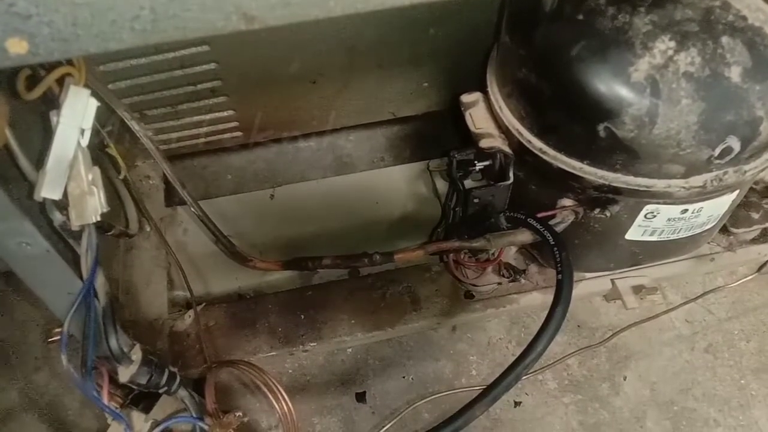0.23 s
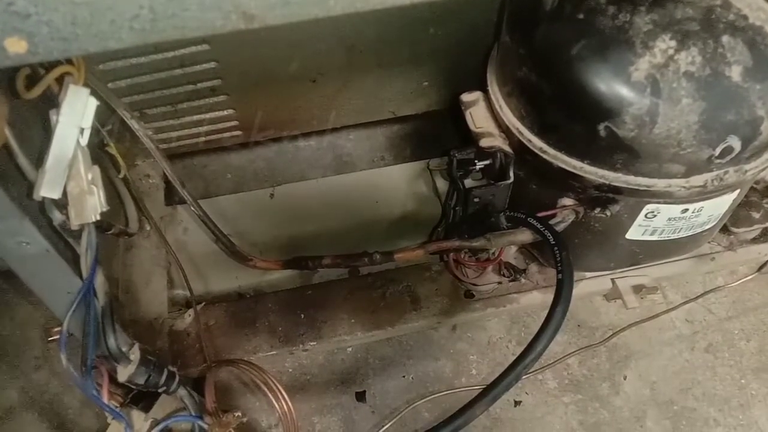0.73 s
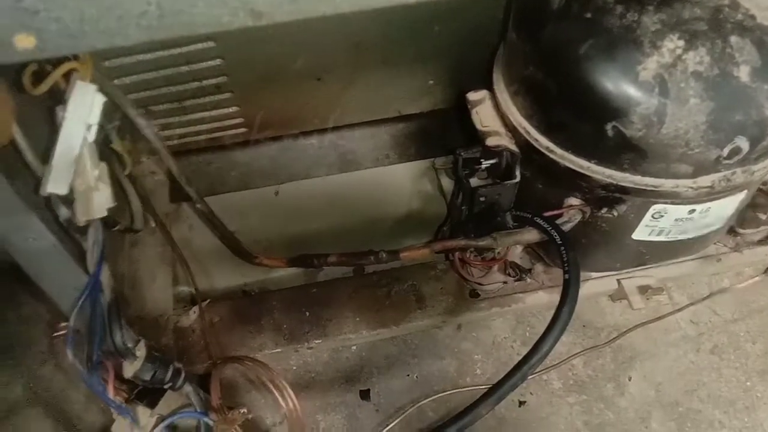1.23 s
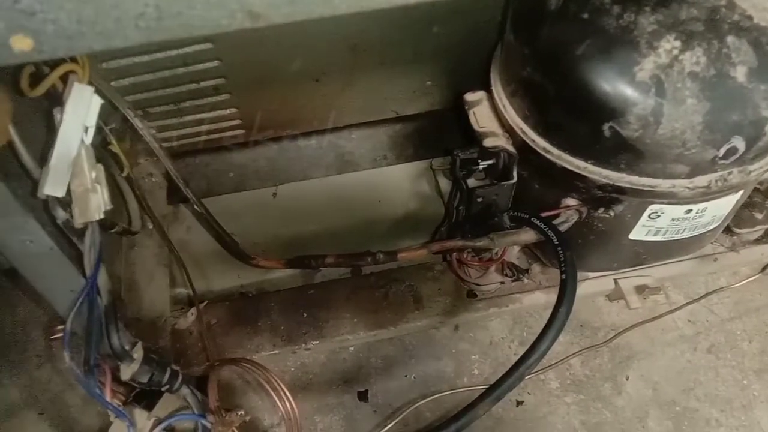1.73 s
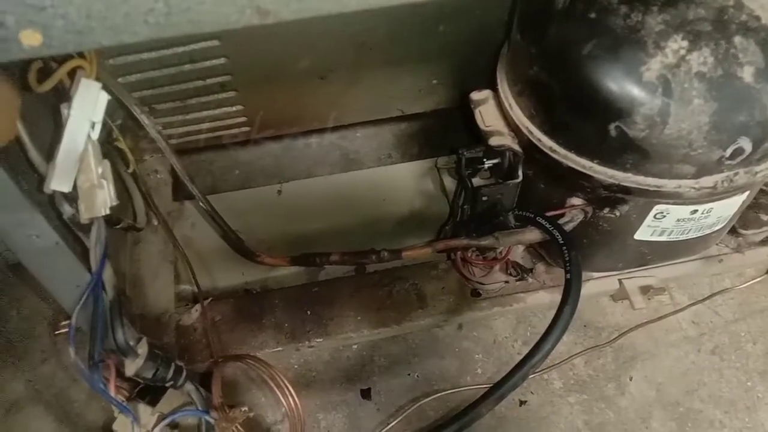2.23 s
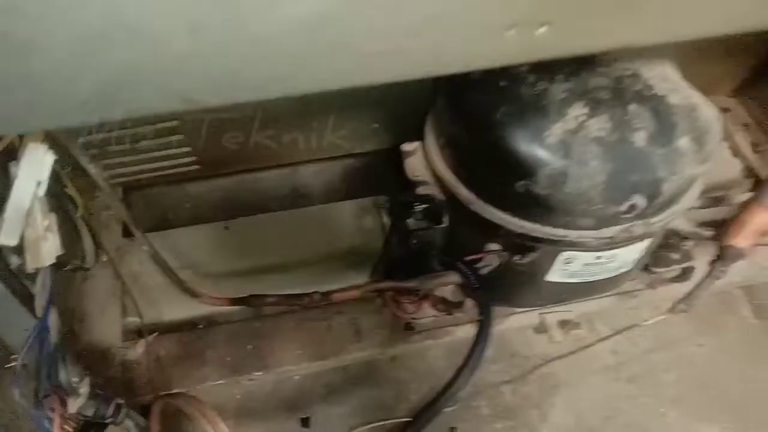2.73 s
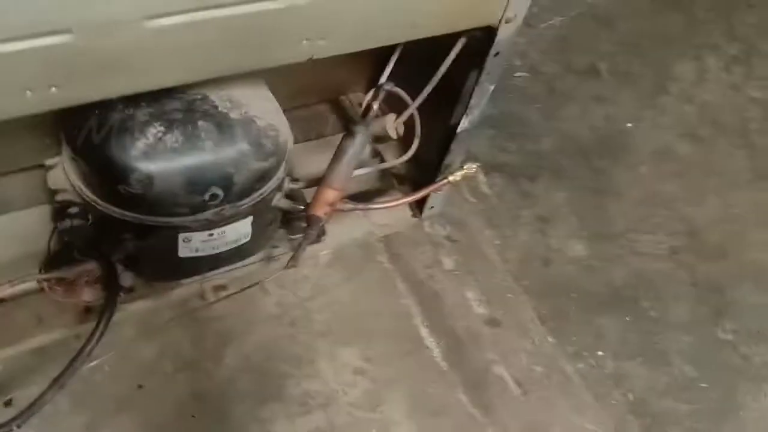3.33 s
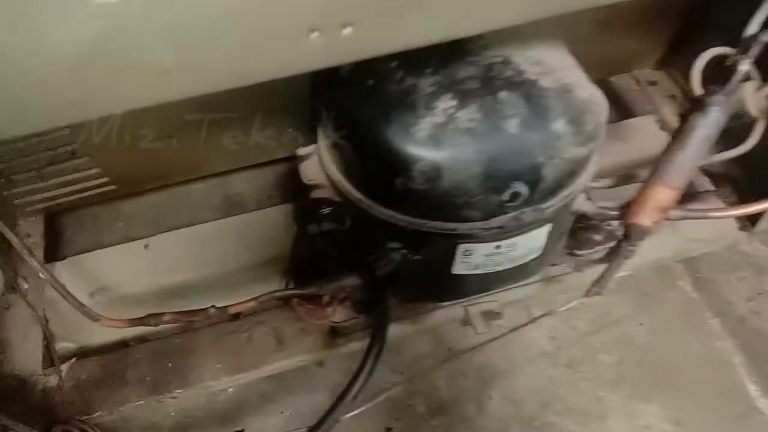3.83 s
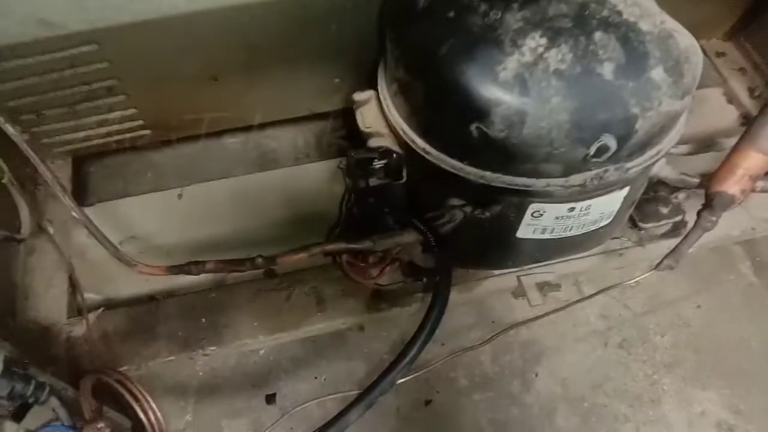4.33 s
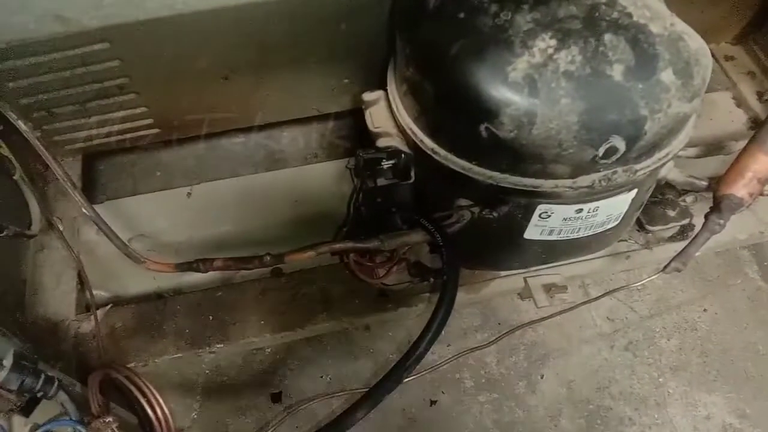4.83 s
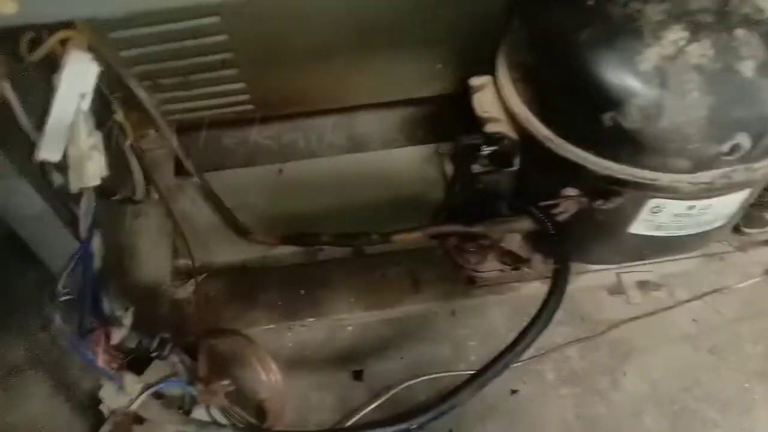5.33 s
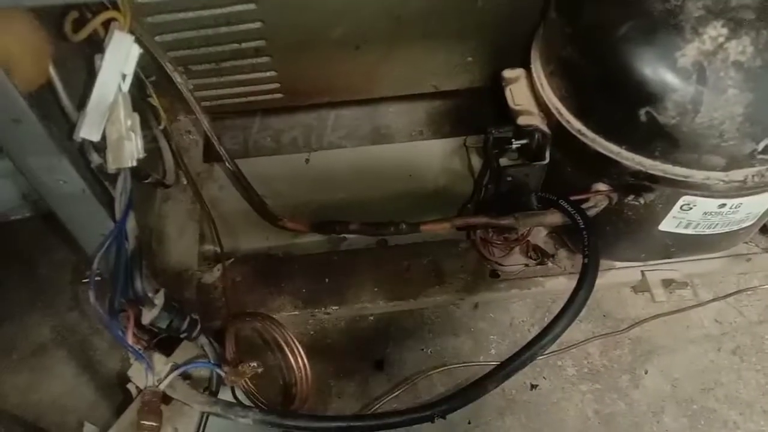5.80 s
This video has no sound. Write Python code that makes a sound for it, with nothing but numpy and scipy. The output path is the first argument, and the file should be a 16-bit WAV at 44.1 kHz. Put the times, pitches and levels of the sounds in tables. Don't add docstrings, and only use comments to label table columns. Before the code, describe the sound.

Cables and connectors clatter down, one snaps sharply home, then small parts rustle, scrape and click with low handling thuds in a quiet workshop.

```python
import sys
import numpy as np
from scipy import signal
from scipy.fft import rfft, irfft, next_fast_len
from scipy.io import wavfile
from scipy.ndimage import uniform_filter1d, map_coordinates

SR = 44100
rng = np.random.default_rng(int(sys.argv[2]) if len(sys.argv) > 2 else 0)


def volts(x):
    e = np.asarray(x, float) / 20
    return 10 ** e


def wav_out(sig):
    wavfile.write(sys.argv[1], SR, np.round(np.clip(np.atleast_2d(sig).T, -1, 1) * 32767).astype(np.int16))


N = 267334

LOUD_IS_BRIGHT = 0.29


def unit(x):
    return x / np.sqrt(np.mean(x ** 2) + 1e-30)


def along(points, hz):
    f, v = np.transpose(points)
    return np.interp(np.log(hz + 1), np.log(f + 1), v)


def wobble(rate_hz, n=N):
    knots = rng.standard_normal(int(n * rate_hz / SR) + 4)
    return map_coordinates(knots, [np.arange(n) * rate_hz / SR])


def filtered(x, gain):
    m = 2 * next_fast_len(x.shape[-1] // 2 + 4096)
    spectrum = rfft(x, m) * gain(np.fft.rfftfreq(m, 1 / SR))
    return irfft(spectrum, m)[..., :x.shape[-1]]


def noise(n, gain):
    return filtered(rng.standard_normal(n), gain)


def causal(gain):
    cepstrum = irfft(np.log(gain + 1e-6))
    half = len(cepstrum) // 2
    cepstrum[1:half] *= 2
    cepstrum[half + 1:] = 0
    return np.exp(rfft(cepstrum))


def peak(hz, centre_hz, width_hz):
    return 1j * hz * width_hz / (centre_hz ** 2 - hz ** 2 + 1j * hz * width_hz)


def over(hz, edge_hz):
    return 1 / (1 + (edge_hz / (hz + 1)) ** 16)


def patchy(x, depth_db):
    z = signal.stft(np.pad(x, (0, 512)), nperseg=512)[2]
    field = uniform_filter1d(rng.standard_normal(z.shape), size=2, axis=0)
    field = uniform_filter1d(field, size=12, axis=1)
    return signal.istft(z * volts(depth_db * unit(field)), nperseg=512)[1][:len(x)]


def add(x, start_s, piece):
    i = round(start_s * SR)
    x[i:i + len(piece)] += piece[:len(x) - i]


def held(time_s):
    taken_s = [
        0,
        .8,
        1.2,
        2.3,
        3.12,
        3.62,
        4.2,
        4.9,
        5.1,
    ]
    return np.searchsorted(taken_s, time_s) - 1


def response(k, ring_db):
    # pitch_hz, density_db (per Hz)
    cable_colours = [
        [(35, -38.5), (60, -0.5), (135, 2), (668, -20), (1230, -9.5), (7600, -12), (9880, -44.5), (16700, -120)],
        [(35, -46), (60, -13), (130, 5.5), (503, -11), (1280, 0), (7600, -20), (9880, -54), (16700, -120)],
        [(180, -9), (300, -3), (838, -8), (934, -12.5), (7600, -30), (9880, -61.5), (16700, -120)],
        [(35, -35), (60, 7.5), (211, -6), (464, -14.5), (1250, -4.5), (7600, -10), (9880, -14), (16700, -120)],
    ]
    # pitch_hz, density_db (per Hz)
    part_colours = [
        [(120, -53), (200, -46), (362, -9.5), (1820, -7), (2700, -4), (7600, -13.5), (9880, -92), (16700, -120)],
        [(120, -51), (200, -36), (435, -17), (1360, -46), (1930, 2.5), (7600, -10.5), (9880, -49),
         (16700, -120)],
        [(35, -20), (60, 7), (852, -10.5), (1070, -20), (4580, -29), (7600, -56), (9880, -75), (16700, -120)],
        [(180, -13), (300, -24), (4480, -18), (6200, -1.5), (7600, -19), (9880, -54), (16700, -120)],
        [(35, -56), (60, 4.5), (172, 8), (403, -6), (1410, -9.5), (7600, -18.5), (9880, -74), (16700, -120)],
    ]
    # pitch_hz, width_hz, level_db
    bodies = [
        [(135, 63, -3.5), (1245, 59, -1), (2500, 150, -10), (5160, 260, -13.5), (7130, 340, -8.5),
         (8354, 120, -14.5)],
        [(1260, 98, 2), (2600, 300, -9.5), (3900, 310, -11.5), (5000, 250, -14.5)],
        [(848, 30, 3), (3040, 180, -19), (6000, 28, -29)],
        [(1246, 77, -1), (2644, 21, 3), (3470, 32, -1), (4660, 54, -3), (5450, 190, -5.5), (6810, 99, -1.5)],
        [(1230, 87, -8), (2260, 64, -7), (3640, 60, -7.5), (5590, 54, -8), (6700, 44, -29), (7130, 78, -7)],
        [(1572, 25, 11.5), (1940, 29, 7), (2457, 50, 11.5), (3255, 44, 4), (5120, 133, 0.5), (7200, 100, -10)],
        [(436, 130, -12), (1260, 53, -12), (3900, 78, -35), (4340, 110, -44)],
        [(6300, 61, -0.5)],
        [(167, 50, -12), (420, 34, 0.5), (1064, 10, -1), (1274, 41, -1.5)],
    ]
    colour = (cable_colours + part_colours)[k]

    def gain(hz):
        power = volts(2 * along(colour, hz))
        for pitch_hz, width_hz, db in bodies[k]:
            power = power + volts(2 * (db + ring_db)) * abs(peak(hz, pitch_hz, width_hz)) ** 2
        return np.sqrt(power)
    return gain


def treble(k):
    # pitch_hz, density_db (per Hz)
    top_octave = [(6000, -46), (7500, 5), (8200, -7.5), (8900, -1), (13400, -11.5), (14900, -7.5),
                  (15500, -9), (15800, -25.5)]
    # pitch_hz, width_hz, level_db
    jingle_hz, jingle_width_hz, jingle_db = (16000, 330, 0)

    def gain(hz):
        jingle = volts(jingle_db) * abs(peak(hz, jingle_hz, jingle_width_hz)) ** 2
        return volts(along(top_octave, hz)) + (k == 0) * jingle
    return gain


def background():
    # time_s, rumble_db
    bustle = [(0, -51), (.17, -68.5), (1, -70.5), (2.4, -66), (4, -64.5), (4.6, -70.5), (5.7, -63),
              (6.06, -66)]
    # pitch_hz, density_db (per Hz)
    rumble_colour = [(13, -66.5), (22, -27), (38, -26.5), (46, -14.5), (65, 3), (253, -14), (329, -21.5),
                     (500, -19), (650, -47), (1100, -120)]
    # pitch_hz, density_db (per Hz)
    hiss_colour = [(180, -26), (300, -8.5), (630, -4.5), (1270, -5.5), (2200, -11), (4100, -15),
                   (6200, -21.5), (7400, -23), (7900, -29.5), (13500, -31), (14800, -27), (15700, -29)]
    # pitch_hz, width_hz, rms_db
    port = [(1248, 85, -75.5)]
    time_s, rumble_db = np.transpose(bustle)
    hiss_db = -76 + 0.37 * (rumble_db - np.median(rumble_db))
    t = np.arange(N) / SR
    rumble = unit(noise(N, lambda hz: volts(along(rumble_colour, hz))))
    rumble *= volts(np.interp(t, time_s, rumble_db) + 1.1 * wobble(24))
    hiss = unit(noise(N, lambda hz: volts(along(hiss_colour, hz))))
    hiss = patchy(hiss, depth_db=3.5) * volts(0.34 * wobble(6.5))
    flicker_db = 3 * wobble(12)
    for pitch_hz, width_hz, db in port:
        band = unit(noise(N, lambda hz: peak(hz, pitch_hz, width_hz) ** 2))
        hiss = hiss + volts(db + 72.5 + flicker_db) * band
    return rumble + volts(np.interp(t, time_s, hiss_db)) * hiss


def swishes():
    # centre_s, length_s,
    # pitch_hz, width_hz, level_db
    soft_swells = [(0.107, 0.049, 3800, 4700, -72), (1.644, 0.036, 6000, 3000, -81.5),
                   (1.799, 0.017, 11030, 4010, -83), (2.051, 0.075, 5320, 777, -78.5),
                   (3.42, 0.077, 2640, 40, -48), (3.42, 0.096, 7130, 59.52, -50.5),
                   (3.661, 0.095, 7200, 252, -71), (4.227, 0.0051, 10560, 4000, -74.5),
                   (4.737, 0.041, 3900, 3000, -76), (5.834, 0.017, 5040, 4940, -74.5)]
    x, t = np.zeros(N), np.arange(-SR // 4, SR // 4) / SR
    for centre_s, length_s, pitch_hz, width_hz, db in soft_swells:
        band = noise(len(t), lambda hz: peak(hz, pitch_hz, width_hz) ** 2)
        band = unit(patchy(band, depth_db=6.5))
        swell = volts(db) * np.exp(-(t / length_s) ** 2) * band
        start_s = centre_s + t[0]
        add(x, max(start_s, 0), swell[max(round(-start_s * SR), 0):])
    return x


def rubbing(rise_s, fade_s, db, weight_db, k):
    # fizz_db, fizz_swing (ratio), thud_db (over body), low_swing (ratio), fade_bend (power)
    rubs = [(-6.5, 1.36, 3, 1.1, 1.9), (-18.5, 1.3, 0.5, 0.85, 2.2), (-15, 1.1, 2, 1.2, 1.75),
            (-9.5, 1.5, -9.5, 0.77, 1.64), (-19, 1, -25, 0.78, 1.4), (-9, 1.28, -13, 0.54, 1.72),
            (-23, 0.61, 1, 0.94, 1.22), (-10, 1.4, -8, 0.19, 1.5), (-19.5, 0.89, 3.5, 1.07, 1.57)]
    grain_db = (2.8, 1.2, 2, 1, 1.5, 2.5, 2.5, 1.2, 2)
    wander_db = (3, 2, 3, 3, 1.5, 3, 2.5, 2, 2.5)
    thud_top_hz, body_top_hz, scratch_top_hz = (300, 1000, 7600)
    fizz_db, fizz_swing, thud_db, low_swing, bend = rubs[k]
    t = np.arange(0, rise_s + 1.3 * fade_s, 1 / SR)
    rising = np.clip(1 - t / rise_s, 0, 1) ** 2
    fading = np.clip((t - rise_s) / fade_s, 0, 2) ** bend
    press_db = -30 * (rising + fading)
    uneven = wobble(400, len(t)) + .4 * wobble(50, len(t))
    contacts = rng.standard_normal(len(t)) * volts(grain_db[k] * uneven)

    rung = filtered(contacts, lambda hz: causal(response(k, ring_db=4)(hz)))
    rung = patchy(rung, wander_db[k])
    thud = filtered(rung, lambda hz: (1 - over(hz, thud_top_hz)) * over(hz, 70))
    body = filtered(rung, lambda hz: over(hz, thud_top_hz) - over(hz, body_top_hz))
    scratch = filtered(rung, lambda hz: over(hz, body_top_hz) - over(hz, scratch_top_hz))
    body_db = weight_db + low_swing * press_db
    low = volts(body_db + thud_db) * unit(thud) + volts(body_db) * unit(body) + volts(press_db) * unit(scratch)

    fizz_db = fizz_db + (k > 0) * LOUD_IS_BRIGHT * (db + 45)
    fizz = unit(patchy(filtered(contacts, treble(k)), depth_db=7.0))
    fizz *= volts(fizz_db + fizz_swing * press_db)
    soft_ends = np.clip(np.minimum(t, t[-1] - t) / 0.0016, 0, 1)
    return soft_ends * volts(db) * (low + fizz)


def handling():
    # start_s, rise_s, fade_s, level_db, weight_db (of the hand)
    strokes = [(.207, 0.017, .16, -61.5, 11.5), (.284, 0.013, 0.44, -37.5, -5), (.42, .2, 0.13, -41, -5),
               (.813, 0.0035, 0.18, -37.5, -8.5), (1.24, 0.014, .18, -69, 8),
               (2.4, 0.0056, 0.34, -41.5, -11.5), (2.479, 0.06, 0.13, -44.5, -2.5),
               (2.601, 0.087, 0.2, -50.5, -20), (2.736, 0.0035, 0.16, -42, -15),
               (2.898, 0.018, 0.15, -60.5, 3), (3.154, 0.03, 0.11, -55, -8), (3.19, 0.18, 0.093, -38, -9),
               (3.34, 0.087, 0.14, -34.5, -11.5), (3.64, 0.072, 0.26, -62, -10.5),
               (3.825, 0.023, .15, -45.5, -19), (4.266, 0.005, 0.11, -61.5, 15.5),
               (4.35, 0.028, .075, -55.5, 8), (4.505, 0.0047, 0.11, -64.5, 2.5),
               (4.98, 0.0072, 0.17, -48, -19.5), (5.127, 0.055, 0.094, -57, 9),
               (5.223, 0.015, 0.092, -53.5, 14.5), (5.266, 0.0056, 0.28, -47.5, 8),
               (5.439, 0.002, 0.1, -57.5, 6.5), (5.585, 0.0092, 0.093, -66, 3.5)]
    x = np.zeros(N)
    for start_s, rise_s, fade_s, db, weight_db in strokes:
        add(x, start_s, rubbing(rise_s, fade_s, db, weight_db, held(start_s)))
    return x


def clicks():
    # start_s, peak_db, pitch_hz, hardness_db
    landing = [(0.2093, -46, 2470, 10.5), (0.2198, -35.5, 1940, -5.5), (0.2838, -22, 2440, -8),
               (0.2969, -17.5, 7700, 0), (0.3156, -16.5, 3660, -14), (0.3533, -20, 5260, -2),
               (0.3642, -19.5, 4300, 4), (.378, -26.5, 3020, -2.5), (.389, -25, 4000, 0),
               (0.4154, -22.5, 3800, -1.5), (0.447, -29, 2520, -4), (0.4915, -28.5, 1550, -8.5),
               (0.5211, -33, 4380, 3), (.5375, -29, 4497, 7), (0.5417, -29.5, 4840, 7.5),
               (.5565, -32.5, 5000, 4), (.617, -36, 3000, 2.5), (0.5936, -29, 5250, 9.5),
               (0.6229, -29, 5360, 6.5), (0.8148, -25.5, 2500, -4), (0.8309, -18, 2980, 4),
               (0.8674, -28.5, 2770, -4), (1.2459, -47, 3550, -2)]
    # start_s, peak_db, pitch_hz
    shuffle = [(2.8988, -45.5, 1590), (2.97, -50.5, 1215), (3.255, -41, 2070), (3.334, -44.5, 1590),
               (3.3515, -28, 5590), (3.689, -47, 1850), (3.7354, -57, 2400), (3.7776, -49, 2400),
               (3.8093, -41, 2300), (3.8224, -40, 2380), (3.838, -38, 2260), (3.8486, -33.5, 1950),
               (3.8882, -48, 2500), (3.9128, -37.5, 1940), (4.2591, -38.5, 2600), (4.271, -41.5, 1620),
               (4.2836, -42, 1900), (4.353, -46, 4500), (4.3549, -38, 4500), (4.383, -57, 4090),
               (4.4048, -45, 2030), (4.51, -53.5, 2750), (4.981, -42, 6180), (5.138, -53, 3200),
               (5.169, -58, 1500), (5.2708, -31, 2130), (5.309, -42, 3740), (5.4407, -42, 3150),
               (5.538, -55, 1880)]
    # top_db, t60_s, attack_s
    ticks = [(-22.5, .02, 0.00052), (-28.5, 0.006, 0.00024), (-40, 0.022, 0.0007), (-32, 0.1, 0.0062),
             (-22.5, 0.12, 0.0017), (-26.5, 0.017, .004), (-40, 0.015, 0.00043), (-14.5, 0.04, 0.00069),
             (-24, 0.028, 0.00061)]
    x, t = np.zeros(N), np.arange(SR // 12) / SR
    for start_s, db, pitch_hz, *hardness_db in landing + shuffle:
        k = held(start_s)
        top_db, t60_s, attack_s = ticks[k]
        top_db = top_db + LOUD_IS_BRIGHT * (db + 45) + sum(hardness_db)
        body = response(k, ring_db=8.0)
        burst = rng.standard_normal(len(t)) * volts(-60 * t / t60_s) * (1 - np.exp(-t / attack_s))

        def tone(hz):
            own_pitch = .22 + abs(peak(hz, pitch_hz, .3 * pitch_hz))
            return body(hz) ** .7 * over(hz, 800) * own_pitch * (1 - over(hz, 6900))

        knock = filtered(burst, lambda hz: causal(tone(hz)))
        top = filtered(burst, lambda hz: causal(treble(k)(hz)))
        click = knock / abs(knock).max() + volts(top_db + 6.0) * top / abs(top).max()
        add(x, start_s, volts(db + 0.5) * click)
    return x


def thuds():
    # start_s, peak_db, pitch_hz
    pushes = [(0.218, -40, 125), (0.296, -19.5, 173), (0.319, -29, 150), (0.356, -25.5, 138),
              (.385, -32, 160), (0.5128, -25.5, 140), (.539, -30, 130), (.596, -34.5, 131),
              (0.831, -29, 246), (2.516, -24.5, 475), (2.97, -29, 620), (3.788, -41.5, 410),
              (4.269, -16.5, 436), (4.277, -27.5, 169), (4.355, -30, 790), (4.372, -36, 330),
              (4.383, -38, 300), (4.405, -32, 770), (4.407, -33.5, 200), (4.537, -41, 179),
              (5.076, -44, 111), (5.135, -32.5, 460), (5.166, -31, 466), (5.185, -31, 486),
              (5.226, -32, 300), (5.242, -31.5, 176), (5.257, -25, 406), (5.272, -18, 188),
              (5.279, -18, 264), (5.288, -18, 520), (5.309, -20, 175), (5.336, -25, 386), (5.362, -26, 350),
              (5.383, -30, 480), (5.443, -24.5, 420), (5.447, -25, 206), (5.507, -38.5, 146)]
    x, t = np.zeros(N), np.arange(SR // 6) / SR
    for start_s, db, pitch_hz in pushes:
        t60_s = 0.015 + 4 / pitch_hz
        sagging_t = t + 0.0018 * (1 - np.exp(-t / 0.003))
        phase = 2 * np.pi * pitch_hz * sagging_t + 0.44 * wobble(118.2, len(t))
        puff = 0.69 * wobble(1600, len(t)) * volts(-60 * t / t60_s)
        envelope = volts(db + 1.5 - 60 * t / t60_s) * (1 - np.exp(-t / 0.006))
        add(x, start_s, envelope * (np.sin(phase) + puff))
    return filtered(x, lambda hz: causal(over(hz, 75)))


def rings():
    # start_s, peak_db, pitch_hz, t60_s
    knocks = [(0.2841, -25, 1260, 0.051), (.2975, -30.5, 1280, .04), (0.3172, -28, 1243, 0.036),
              (.3175, -29, 3560, 0.068), (0.353, -31.5, 1243, 0.092), (0.379, -32.5, 1200, 0.028),
              (0.4182, -29, 1230, 0.035), (.448, -29.5, 1210, 0.033), (0.4921, -31.5, 1260, 0.026),
              (0.5061, -32, 1242, .04), (.5387, -39.5, 2500, .08), (0.5942, -37.5, 1230, 0.038),
              (0.6233, -38.5, 1270, 0.068), (0.8152, -31, 1260, 0.14), (.832, -30, 1260, 0.11),
              (2.742, -44.5, 1260, 0.17), (2.742, -48.5, 2710, .12), (4.26, -36, 2710, 0.013),
              (4.306, -42, 803, .02), (4.324, -50, 794, 0.019)]
    x, t = np.zeros(N), np.arange(SR // 8) / SR
    for start_s, db, pitch_hz, t60_s in knocks:
        shake = .5 * wobble(300, len(t))
        envelope = volts(db - 60 * t / t60_s) * (1 - np.exp(-t / .0006))
        add(x, start_s, envelope * np.sin(2 * np.pi * pitch_hz * t + shake))
    return x


def snaps():
    # start_s, peak_db
    spikes = [
        (.8312, -7),
        (.8322, -15),
        (.8328, -15),
        (.8674, -24),
        (.2968, -18),
        (.3170, -19),
        (5.2714, -30),
    ]
    x, u = np.zeros(N), np.arange(-20, 60) / (SR * .00005)
    pulse = np.exp(-u ** 2) - .4 * np.exp(-((u - 4) / 2.5) ** 2)
    for start_s, db in spikes:
        add(x, start_s, -volts(db) * pulse)
    return x


def clink():
    # pitch_hz, level_db, t60_s
    brass_modes = [(2150, -4, 0.16), (5960, -4, .16), (4950, -17, 0.16), (5460, -6, 0.42),
                   (6200, 4.5, 0.14), (8506, -12, 0.23), (9900, -4.5, 0.24), (11200, -20, .2),
                   (12130, -12, 0.17), (15120, -14, .13)]
    # start_s, level_db
    start_s, clink_db = (4.982, -43.5)
    x, t = np.zeros(N), np.arange(SR // 3) / SR
    ring = np.zeros(len(t))
    for pitch_hz, db, t60_s in brass_modes:
        level = volts(db + 2.4 * wobble(95, len(t)) - 60 * t / t60_s)
        ring += level * np.sin(2 * np.pi * pitch_hz * t + .6 * wobble(95, len(t)))
    add(x, start_s, volts(clink_db) * ring * (1 - np.exp(-t / 0.012)))
    return x


def walls(x):
    # pitch_hz, t60_s
    decay = [(150, .25), (1500, .18), (8000, .13), (15000, .1)]
    hz, t, z = signal.stft(rng.standard_normal(SR // 2), SR, nperseg=256)
    z = z * volts(-60 * t / along(decay, hz)[:, None])
    tail = signal.istft(z, SR, nperseg=256)[1]
    delayed = np.pad(x, (150, 0))
    return signal.fftconvolve(delayed, tail / np.linalg.norm(tail))[:N]


def scene():
    hits = clicks() + rings() + snaps() + clink()
    mono = hits + volts(-8.0) * walls(hits) + thuds() + volts(-2) * handling() + swishes() + background()
    return np.array([mono, mono])


def band_limit(x):
    return signal.sosfilt(signal.butter(12, 16670, fs=SR, output="sos"), x)


def record(dry):
    # start_s, end_s, lowest_hz, level_db
    apart = [(.2, .23, 5000, -7), (.345, .38, 4700, -6), (.38, .53, 11000, -9), (.53, .66, 7500, -8),
             (.805, .825, 6000, -7), (3.84, 3.87, 4700, -6), (5, 5.27, 10000, -9), (5.27, 5.31, 5000, -9),
             (5.31, 5.58, 11000, -9)]
    top_hz = 15750
    mono = filtered(dry[0], lambda hz: np.where(hz < top_hz, 1, volts(-20.5)))
    hz, t, z = signal.stft(mono, SR, nperseg=512)
    share = np.zeros(z.shape)
    for start_s, end_s, low_hz, db in apart:
        in_band = (hz > low_hz) & (hz < .9 * top_hz)
        share += volts(db) * np.outer(in_band, (t > start_s) & (t < end_s))
    random_phase = np.exp(2j * np.pi * rng.random(z.shape))
    side = signal.istft(z * share * random_phase, SR, nperseg=512)[1][:N]
    return band_limit(np.array([mono + side, mono - side]))


dry = scene()
out = record(dry)
wav_out(out)
```